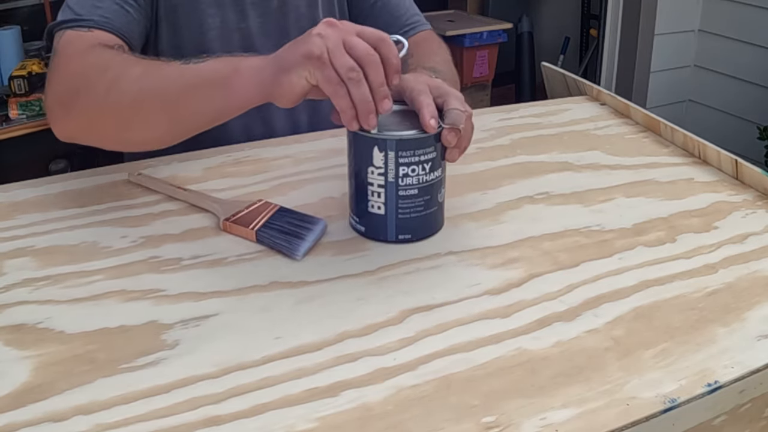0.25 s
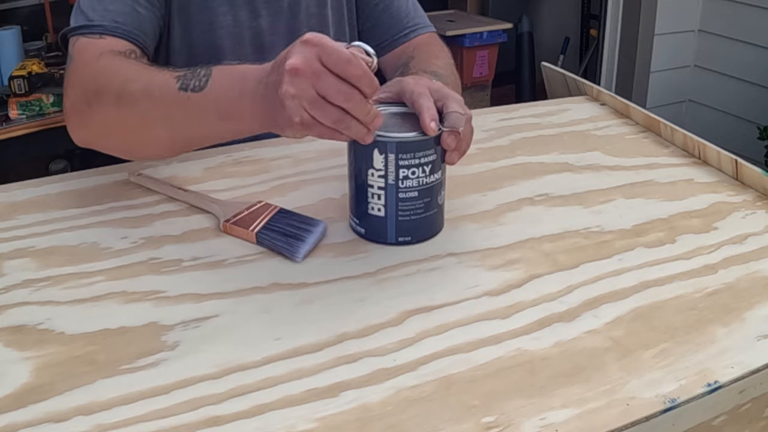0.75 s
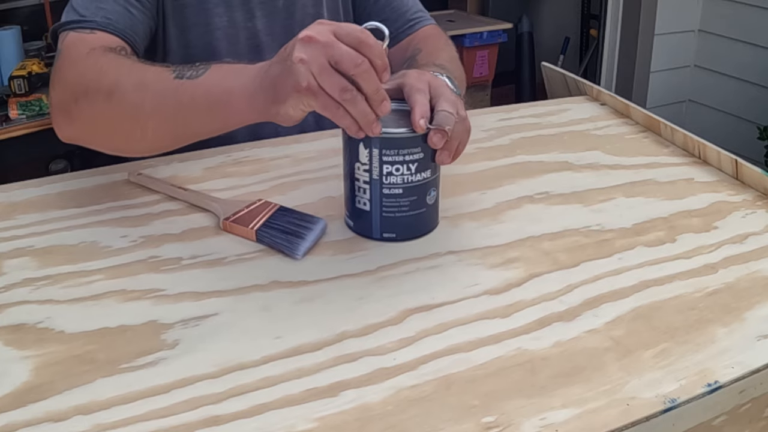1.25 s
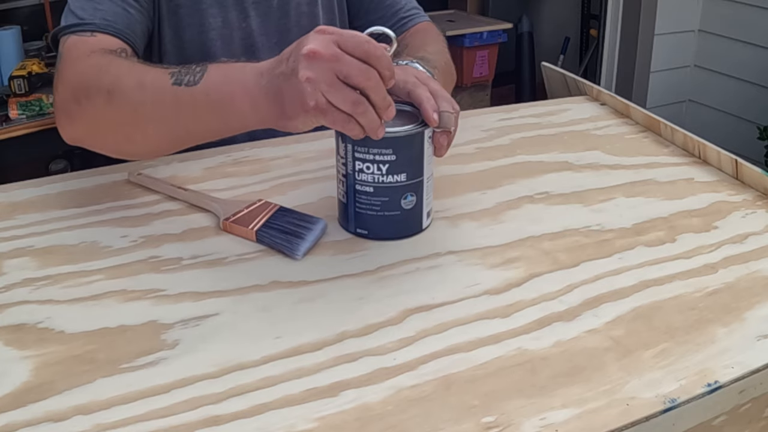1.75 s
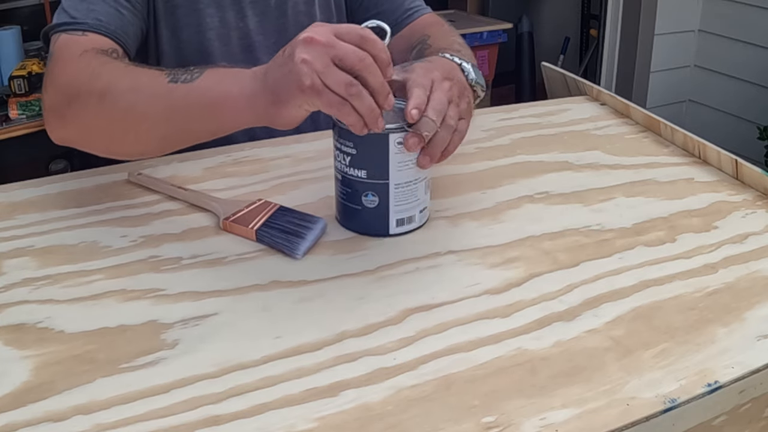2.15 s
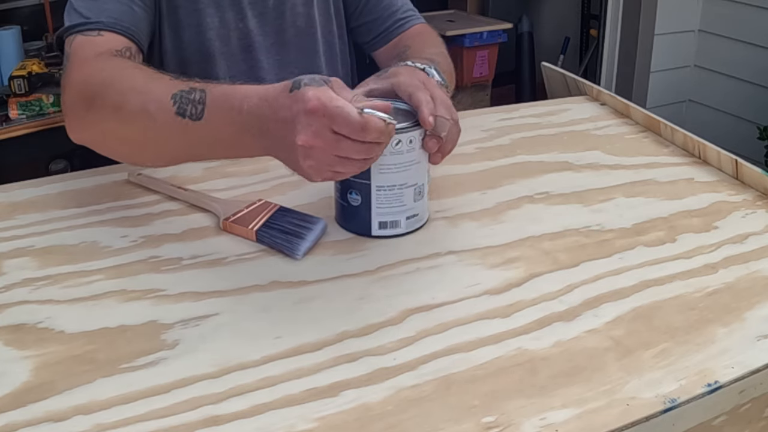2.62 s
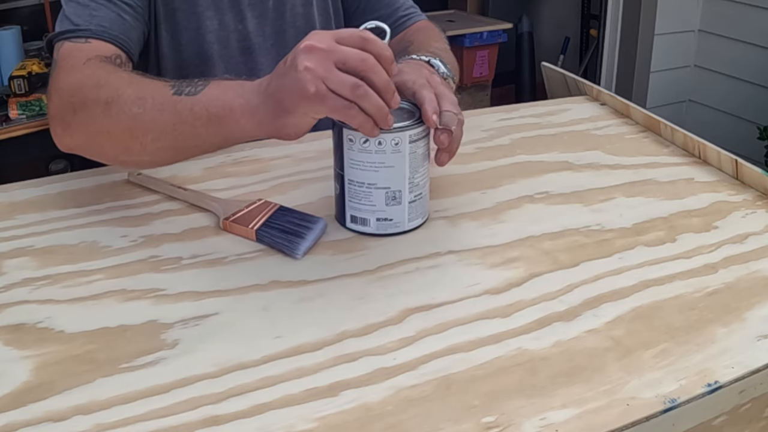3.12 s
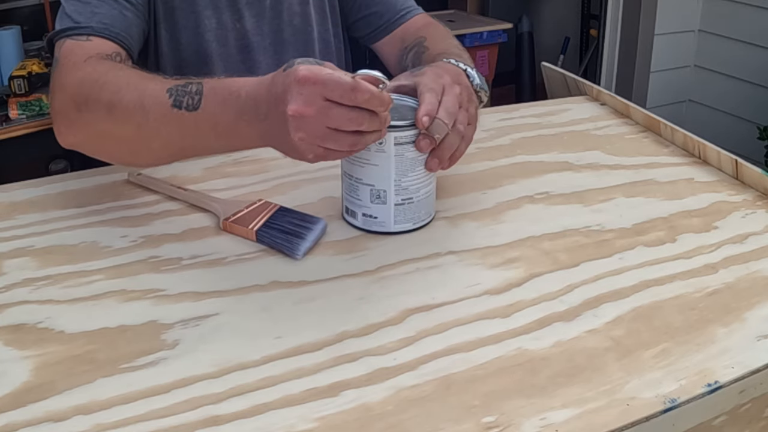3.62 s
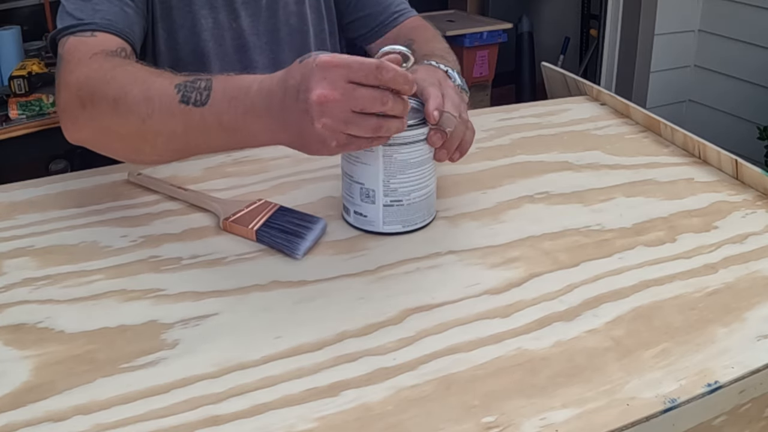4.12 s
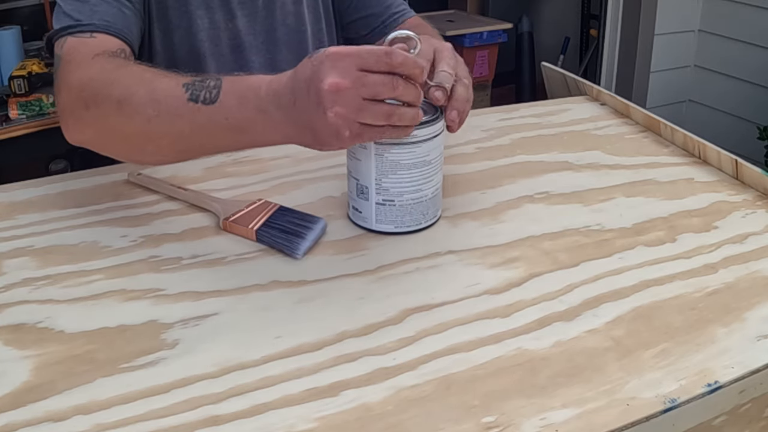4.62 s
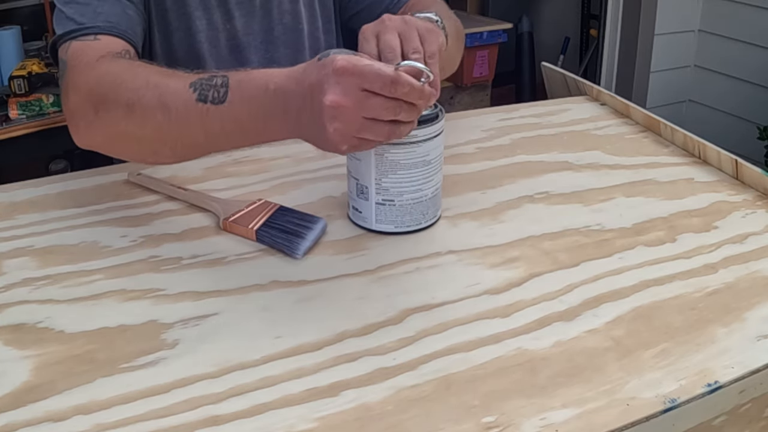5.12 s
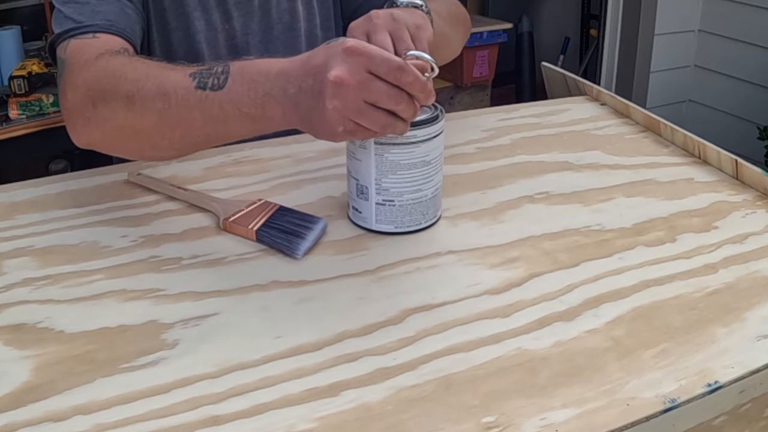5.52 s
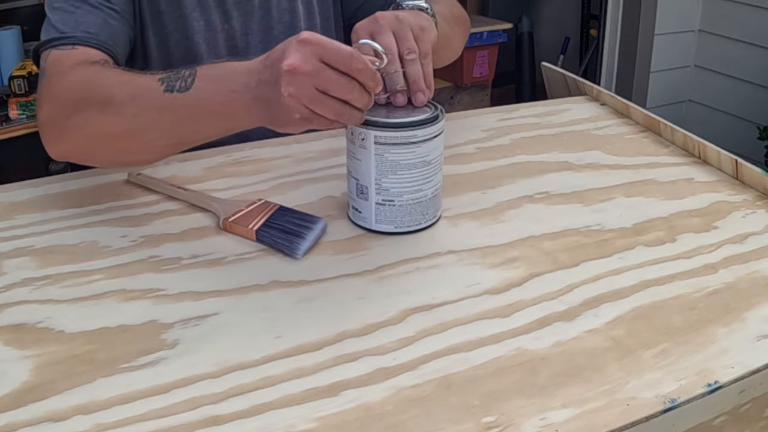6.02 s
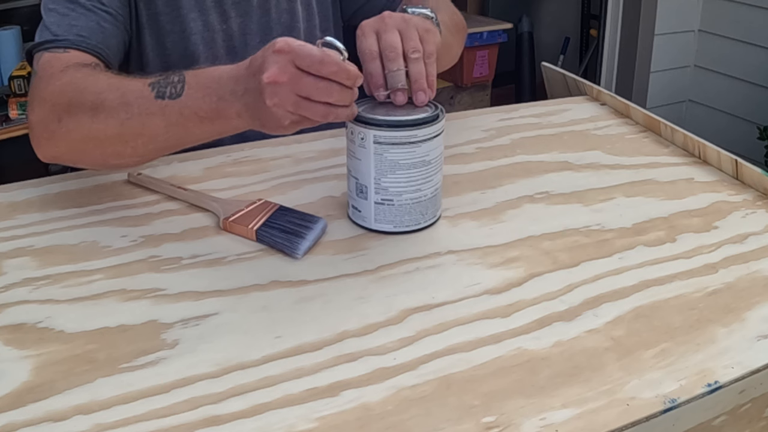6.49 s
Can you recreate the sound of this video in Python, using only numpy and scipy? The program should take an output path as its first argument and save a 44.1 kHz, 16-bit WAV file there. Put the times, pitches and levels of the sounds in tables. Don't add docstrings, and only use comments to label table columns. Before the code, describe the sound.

Over soft distant traffic and leaves, a steel key taps a full can, then snaps loudly against its lid. Buffeting wind puffs, board thumps and dry scraping accompany the can's turning. Short skids and finger rubs continue, a faint insect buzzes, a motor hums low far away, and a last click leads to the lid rubbing loose. Short outdoor-like reflections.

```python
import sys
import numpy as np
from scipy import signal
from scipy.fft import rfft, irfft
from scipy.io import wavfile
from scipy.ndimage import uniform_filter1d

SR = 44100
rng = np.random.default_rng(int(sys.argv[2]) if len(sys.argv) > 2 else 0)


def file_out(sig):
    cols = np.atleast_2d(sig).T
    lim = np.clip(cols, -1, 1)
    pcm = np.round(lim * 32767).astype(np.int16)
    wavfile.write(sys.argv[1], SR, pcm)


def invert_db(x):
    u = np.asarray(x, float) / 20
    return 10 ** u


N = 297675
TIME = np.arange(N) / SR

# tone in Hz, level in dB, time to fall 60 dB in seconds.
LID_MODES = [(1175, 7, 0.008), (1455, -4, 0.065), (1587, -2.5, 0.034), (1970, -8, 0.042)]
KEY_MODES = [(4864, 3, 0.039), (5430, 16, 0.011), (5820, 6.5, 0.021), (6380, 2, 0.029), (7800, -9, 0.007),
             (10150, -34, .02), (11400, -14, 0.0091)]
RIM_MODES = [(2127, -15, 0.066), (2652, -3.5, 0.027), (3400, -35, 0.04), (3666, -14, 0.065)]
# start in seconds, rim level in dB, then key, lid and can body
# in dB relative to the rim.
CLICK_EVENTS = [(0.037, -34.5, -1.5, 10.5, 5.5), (0.0492, -36.5, -6, -6, 11.5), (0.3544, -25.5, 0, 2, -4.5),
                (0.641, -67.5, 12.5, -1, -10), (0.9723, -36.5, -2, -3.5, -6), (2.0926, -49, -4, 3, 6.5),
                (2.3081, -36, -5, -20, -14), (2.7148, -30, -10, -5, 3.5), (2.7305, -37, 6, 11.5, 6.5),
                (2.834, -32.5, -7, -12, -4), (3.0669, -40, -4, 3, 9), (3.1856, -43, -29, -13, 13.5),
                (3.2136, -33, -9.5, 5, 7.5), (3.5078, -50, 0.5, 7, 11), (3.6174, -54.5, 4, 6, -6),
                (3.9807, -48, -5, -12, 8.5), (4.0041, -49, -30, -2, 14.5), (4.4225, -62.5, -22, 1, 24.5),
                (4.721, -66.5, 13, -5, -9), (5.084, -46.5, 2, -2.5, 3), (5.5735, -34.5, -1.5, 1.5, 5),
                (5.8323, -53, -8, 11, 17), (6.6501, -37, -11, -21, 0)]


def evened(x):
    return x / np.sqrt(np.mean(x ** 2) + 1e-20)


def read(points, hz):
    f, value = np.transpose(points)
    return np.interp(np.log(hz + 1), np.log(f + 1), value)


def add(mix, s, sound):
    part = mix[round(s * SR):][:len(sound)]
    part += sound[:len(part)]


def coloured(x, points):
    size = x.shape[-1]
    gain = invert_db(read(points, np.fft.rfftfreq(size, 1 / SR)))
    return evened(irfft(rfft(x) * gain, size))


def ringing(modes, t, extra_db=0):
    hz, db, t60 = np.transpose(modes)[:, :, None]
    fading = invert_db(db + np.reshape(extra_db, (-1, 1)) - 60 * t / t60)
    ring = (fading * np.sin(2 * np.pi * hz * t)).sum(0)
    return ring / abs(ring).max()


def grains(size, spread_db, share):
    big = invert_db(spread_db * np.minimum(rng.exponential(1, size), 4))
    return rng.standard_normal(size) * big * (rng.random(size) < share)


def window(t, start, end, attack_s, release_s):
    return np.clip(np.minimum((t - start) / attack_s, (end - t) / release_s), 0, 1)


def background():
    # tone in Hz, likeness of left and right from 0 to 1.
    likeness = [(60, 0.99), (180, 1), (530, 0.82), (1570, 0.3), (4660, 0.7), (13800, 0.4)]
    # tone in Hz, left minus right in dB.
    balance = [(60, -1), (180, -0.5), (530, 3.5), (1570, 3), (4660, -0.5), (13800, 6)]
    # tone in Hz, level in dB per Hz.
    air_colour = [(12, -24), (22, -22), (45, -4), (70, -2), (130, -5.5), (165, -17), (250, -18.5),
                  (550, -25.5), (1300, -30.5), (2200, -41.5), (4000, -50), (6400, -49.5), (7700, -54.5),
                  (8400, -62.5), (12300, -66), (13500, -85)]
    level_db, patch_db = -41.5, 1.6
    frames, hz = N // 512 + 5, np.fft.rfftfreq(2048, 1 / SR)
    a, b, c, d, patches = rng.standard_normal((frames, 1025, 5)).T
    patches = uniform_filter1d(patches, size=24, axis=0)
    patches = evened(uniform_filter1d(patches, size=8, axis=1))
    same = np.clip(read(likeness, hz), 0, 1)[:, None]
    lean = invert_db(read(balance, hz) / 2)[:, None]
    left = a + 1j * b
    right = same * left + np.sqrt(1 - same ** 2) * (c + 1j * d)
    z = np.array([lean * left, right / lean])
    z *= invert_db(read(air_colour, hz)[:, None] + patch_db * patches)
    return invert_db(level_db) * evened(signal.istft(z, nperseg=2048, noverlap=1536)[1][:, :N])


def wind():
    # middle in seconds, length in seconds, rumble in dB, flutter in dB relative to the rumble,
    # left minus right in dB.
    gusts = [(0.065, 0.075, -35, -4.5, -1), (0.388, 0.058, -46.5, 16.5, -2), (1.015, 0.19, -26.5, -10, 3.5),
             (1.232, 0.18, -26, -13, -5), (1.52, 0.3, -32.5, -14.5, -6), (1.704, 0.11, -26.5, -0.5, -10.5),
             (1.805, 0.12, -23, -11, -7.5), (1.99, 0.12, -32.5, -18.5, -9), (2.265, 0.33, -31.5, -13, -5.5),
             (2.613, 0.3, -29.5, -37, -2), (2.73, 0.28, -28, -3, -6), (2.878, 0.097, -32, -12, -5),
             (3.052, 0.19, -32.5, -9, -1), (3.245, 0.17, -48, -5, -2), (3.54, 0.15, -45, -16, 0),
             (3.652, 0.27, -40.5, -9.5, 0), (3.873, 0.084, -48, -2, 4), (3.989, 0.27, -33, -10.5, -2),
             (4.187, 0.16, -37.5, -32, -5), (4.607, 0.079, -38.5, -5.5, 0)]
    edge_db = -11
    shared, left, right = grains((3, N), 1.2, 260 / SR)
    eddies = 1.14 * shared + 0.5 * np.array([left, right])
    rumble = coloured(eddies, [(8, -38), (22, 8.5), (70, -4.0), (110, -14.0), (200, -54), (400, -140)])
    flutter = coloured(eddies, [(50, -6.5), (100, -7.5), (170, -3.5), (300, -14), (500, -35.5),
                                (900, -52.0), (2000, -140)])
    middle, length, db, flutter_db, pan_db = np.transpose(gusts)[:, :, None]
    coarse = TIME[::64]
    arch_db = db + edge_db * (2 * (coarse - middle) / length) ** 2
    ports_db = np.array([arch_db + pan_db / 2, arch_db - pan_db / 2])
    low = [np.interp(TIME, coarse, gain) for gain in invert_db(ports_db).sum(1)]
    high = [np.interp(TIME, coarse, gain) for gain in invert_db(ports_db + flutter_db).sum(1)]
    return low * rumble + high * flutter


def catch(db, hz, rise_s, haste):
    t = np.arange(0, 8 * rise_s, 1 / SR)
    slip = evened(uniform_filter1d(rng.standard_normal(len(t)), size=round(rise_s * SR / 2)))
    swell = haste * t / rise_s * np.exp(1 - haste * t / rise_s)
    return invert_db(db) * (1 + 0.27 * slip) * swell * np.sin(2 * np.pi * hz * t)


def catches():
    # time in seconds, level in dB, tone in Hz.
    pings = [(0.0354, -56, 11200), (0.0354, -60, 7300), (5.5735, -33, 3270), (0.0484, -54, 9000),
             (0.0484, -41, 4760), (0.0489, -58.1, 10750), (0.9723, -53, 10860), (0.9723, -58, 7800),
             (0.9728, -53, 9100), (0.9733, -57, 9800), (2.1476, -46, 4760), (2.1551, -45.5, 5943),
             (2.1556, -39.5, 1860), (2.1611, -37.5, 3050), (2.1651, -40, 1760), (2.1656, -48.5, 4500),
             (2.178, -43, 1540), (2.1795, -43, 3600), (2.2958, -41, 3430), (2.3078, -55, 5890),
             (2.3078, -39, 3280), (2.7133, -51.7, 10900), (2.7143, -48, 11800), (2.7143, -52, 9700),
             (2.7163, -44, 4530), (2.7298, -52, 12150), (2.7308, -43, 7105), (2.7323, -41, 3600),
             (2.7867, -54, 2380), (2.7956, -44, 2300), (2.8011, -46, 3140), (2.8326, -53, 4280),
             (2.8331, -55, 10292), (3.2127, -31, 3230), (3.9241, -45, 4940), (5.3748, -42.5, 1535),
             (5.5723, -30.5, 1160), (5.5733, -38.5, 5540), (5.5738, -32, 2090), (5.6357, -39, 1510),
             (5.8597, -44.5, 2450), (5.8607, -46, 5230), (5.9315, -46, 1770), (5.9609, -51, 5400)]
    # time in seconds, level in dB, tone in Hz.
    nicks = [(0.9723, -59, 7795), (0.9733, -51, 3930), (0.9775, -41, 1010), (1.2621, -54, 3470),
             (1.2661, -49, 1750), (1.2726, -52.2, 1851), (1.298, -54, 3110), (1.4143, -52, 3570),
             (1.4352, -54, 1894), (1.4477, -50, 2990), (1.453, -42, 1248), (1.4647, -48, 1060),
             (1.4707, -55, 5340), (1.4726, -50, 1500), (1.542, -45.5, 1050), (2.741, -48, 840),
             (2.7804, -47, 1033), (2.7867, -60, 2480), (2.7931, -50, 1076), (2.8101, -55, 3100),
             (2.8328, -38, 1100), (5.5735, -36, 2630), (3.1218, -50, 1840), (3.1837, -45, 3280),
             (3.2148, -39.5, 3680), (3.5055, -54, 1020), (3.5507, -46.5, 1230), (3.5624, -53, 1340),
             (3.8268, -60, 5440), (3.8303, -54, 2560), (3.8308, -50, 1040), (3.8792, -47, 3370),
             (3.9221, -52, 1937), (3.9226, -57, 6640), (3.9889, -48, 1937), (3.9899, -56, 1033),
             (4.4528, -43, 1660), (4.4564, -50, 2700), (4.458, -53, 1033), (4.4653, -50, 3550),
             (4.4733, -58, 1390), (4.5063, -49, 1830), (4.5097, -55, 2700), (4.5382, -45, 1720),
             (5.8312, -48, 2730), (5.8309, -41, 1020), (5.8657, -51, 3660), (5.902, -51, 1500),
             (5.9295, -48, 3400), (5.947, -57, 5230), (5.949, -50, 3402), (5.9759, -42.5, 1679),
             (5.9779, -51, 5900)]
    # time in seconds, level in dB, tone in Hz.
    jolts = [(0.0339, -33, 960), (0.0339, -43, 368), (0.0344, -41, 635), (0.0454, -31.5, 378),
             (0.0459, -41, 947), (0.0479, -29, 682), (1.2721, -35, 586), (1.3399, -41, 574),
             (1.3794, -40, 622), (1.4078, -41.5, 620), (1.518, -43, 565), (1.537, -40, 603),
             (2.1481, -40, 627), (2.1606, -57, 373), (2.1621, -40, 566), (2.201, -44, 643),
             (2.2529, -43, 946), (2.2604, -35, 630), (2.2873, -32, 624), (2.2923, -41.5, 963),
             (2.7178, -26.5, 580), (2.722, -43, 1050), (2.7303, -34, 824), (2.7343, -30.5, 371),
             (2.7482, -41, 1150), (2.8016, -35.5, 350), (2.8316, -39, 550), (2.837, -39, 866),
             (3.0655, -40, 660), (3.1818, -56, 940), (3.1838, -38, 627), (3.2122, -32, 660),
             (3.8956, -52, 626), (3.9221, -51, 575), (3.9789, -37, 332), (3.9879, -41, 607),
             (4.0014, -42.5, 331), (4.0029, -41, 646), (4.4698, -39.5, 634), (4.5052, -41.5, 580),
             (5.5703, -37, 870), (5.5718, -35.5, 536), (5.5743, -44, 324), (5.8337, -33.5, 484),
             (5.8597, -30.5, 383), (5.9669, -42.5, 584), (5.9954, -38.5, 573), (6.0113, -39.5, 570),
             (6.0492, -52, 581), (6.118, -55, 547)]
    ping_rise_s, jolt_rise_s = .0018, .0045
    blow_reach_s, blow_haste = .007, 1.7
    blows = np.append(np.transpose(CLICK_EVENTS)[0], np.inf)
    out = np.zeros(N)
    for rows, rise_s in ((pings, ping_rise_s), (nicks, ping_rise_s), (jolts, jolt_rise_s)):
        for s, db, hz in rows:
            start, haste = s - rise_s / 2, 1
            blow = blows[np.searchsorted(blows, start)]
            if blow - start < blow_reach_s:
                start, haste = blow, blow_haste
            add(out, start, catch(db, hz, rise_s, haste))
    return out


def struck(modes, db):
    t = np.arange(9000) / SR
    return invert_db(db) * ringing(modes, t) * (1 - np.exp(-t / 0.00025))


def thumps():
    # time in seconds, level in dB, board tone in Hz.
    board_knocks = [(0.036, -35, 324), (0.0492, -31.5, 315), (0.3539, -22.5, 307), (0.973, -33.5, 210),
                    (2.716, -18, 197), (2.762, -28.5, 133), (2.778, -19.5, 91), (2.797, -20.5, 111),
                    (3.2135, -36, 282), (4.004, -35, 291), (5.084, -38, 244.5), (5.5763, -27, 230),
                    (5.862, -28, 399), (6.653, -32, 335)]
    out = np.zeros(N)
    for s, db, hz in board_knocks:
        add(out, s, struck([(hz, 0, .06), (1.28 * hz, -6, .04)], db))
    return out


def rattling(ring, depth):
    flutter = evened(uniform_filter1d(rng.standard_normal(len(ring)), size=130))
    return ring * (1 + depth * flutter * np.minimum(np.arange(len(ring)) / 500, 1))


def lid_rings():
    # tone in Hz, level in dB, time to fall 60 dB in seconds.
    knock_modes = [(1460, -11, 0.083), (2270, -7, 0.15), (2630, 5, 0.13), (2930, 1, 0.065), (3400, -22, .1),
                   (3560, -13, 0.037)]
    snap_modes = [(956, 16.5, 0.016), (1545, -11, 0.028), (2186, -2.5, 0.1), (2850, 18.5, 0.015),
                  (2870, -8, 0.039), (3660, 4, 0.02), (5170, -16, 0.024), (6000, 2, 0.022)]
    snap_long_modes = [(1276, -20, .2), (2676, -9, .18), (3345, -15, .22), (945, -8, .24)]
    out = np.zeros(N)
    add(out, 0.036, rattling(struck(knock_modes, -35), .65))
    add(out, .3556, rattling(struck(snap_modes + snap_long_modes, -9), .2))
    return out


def click(db, key_db, lid_db, can_db, rim_hz):
    # tone in Hz, level in dB, time to fall 60 dB in seconds.
    can_modes = [(560, 2, 0.22), (627.5, 9, 0.077), (710, 8, 0.0067), (814, 3.5, 0.026), (885, -15, 0.065),
                 (940, 13, 0.024)]
    # low edge in Hz, high edge in Hz,
    # time for the crack to fall 60 dB in seconds, share of ringing from 0 to 1.
    parts = [(1860, 3440, 0.028, 0.62), (4430, 10100, 0.012, 0.76), (1224, 1660, 0.012, 0.67),
             (398, 940, 0.1, 0.64)]
    tick_db, tick_t60_s = -9, 0.006
    t = np.arange(5000) / SR
    rise = 1 - np.exp(-t / 0.0002)
    contact = uniform_filter1d(rng.standard_normal(len(t)), size=3)
    out = invert_db(db + tick_db - 60 * t / tick_t60_s) * rise * contact
    objects = RIM_MODES + [(rim_hz, 3, .018)], KEY_MODES, LID_MODES, can_modes
    for gain_db, modes, (low, high, t60, share) in zip((0, key_db, lid_db, can_db), objects, parts):
        band = signal.butter(2, [low, high], "bandpass", fs=SR, output="sos")
        crack = signal.sosfilt(band, rng.standard_normal(len(t)) * rise * invert_db(-60 * t / t60))
        ring = ringing(modes, t, 2 * rng.standard_normal(len(modes))) * rise
        part = (1 - share) * crack / abs(crack).max() + share * ring
        out = out + invert_db(db + gain_db) * part / abs(part).max()
    return out


def spot(hz):
    return hz * (1 + 0.095 * rng.standard_normal())


def clicks():
    out = np.zeros(N)
    for s, *blow in CLICK_EVENTS:
        add(out, s, click(*blow, spot(2890)))
    return out


def puffs():
    # middle in seconds, level in dB, left minus right in dB, tone in Hz.
    eddies = [(0.985, -22, -1, 87), (1.004, -19.5, -10, 80.7), (1.214, -21, -4, 78), (1.441, -19.5, 9, 96),
              (1.636, -17, -8.5, 131), (1.656, -15, -7, 81), (1.675, -31, -1, 99.6), (1.72, -13, 5, 79),
              (1.18, -21.5, -5, 80), (1.804, -19.5, -8, 80.7), (1.825, -15.5, -6.5, 86),
              (2.548, -29, -13, 81), (2.644, -14.5, -9, 108.5), (2.674, -17, -9, 116),
              (2.726, -14, -1, 101), (2.739, -13, -2, 116), (2.754, -13, -4, 132), (3.033, -14, -5.5, 95),
              (3.044, -19, -10, 131), (1.74, -22.5, -11, 287), (2.648, -31, -10, 362),
              (2.72, -16.5, -2, 560)]
    out, t = np.zeros((2, N)), np.arange(-900, 900) / SR
    for s, db, pan_db, hz in eddies:
        push = np.cos(2 * np.pi * hz * t + 2 * np.pi * rng.random()) * np.exp(-(t * hz / 0.45) ** 2)
        add(out[0], s + t[0], invert_db(db + pan_db / 2) * push)
        add(out[1], s + t[0], invert_db(db - pan_db / 2) * push)
    return out


def seal():
    # time in seconds, level in dB.
    leak = [
        (1.001, -65.5),
        (1.05, -47),
        (1.064, -50.5),
        (1.08, -68),
        (1.1, -86),
    ]
    # tone in Hz, level in dB per Hz.
    hiss_colour = [(1180, -42), (2000, -7), (2380, -24), (2500, 1), (2670, 0.5), (4330, -9), (6490, -1),
                   (7900, -14.5), (11300, -6.5), (14300, -25)]
    s, db = np.transpose(leak)
    t = np.arange(s[0], s[-1], 1 / SR)
    hiss = coloured(rng.standard_normal(len(t)), hiss_colour)
    return s[0], invert_db(np.interp(t, s, db)) * hiss * signal.windows.tukey(len(t), .2)


def hum():
    # start in seconds, end in seconds, level in dB.
    loose_grips = [(1.234, 1.342, -47.5), (1.316, 1.496, -48.5), (1.502, 1.554, -41), (2.13, 2.2, -52),
                   (2.238, 2.324, -35.5), (3.054, 3.124, -36), (3.88, 3.932, -46), (3.958, 4.043, -41),
                   (4.42, 4.498, -44), (5.925, 6.02, -42), (6.032, 6.211, -41.5)]
    short = np.arange(6000) / SR
    body = invert_db(-60 * short / 0.085) * np.sin(2 * np.pi * 618 * short)
    hollow = evened(signal.oaconvolve(grains(N, 1.8, .15), body)[:N])
    level, fade_s = np.zeros(N), 0.024
    for start, end, db in loose_grips:
        level += invert_db(db - 6.5) * window(TIME, start, end, fade_s, fade_s)
    return hollow * level


def stroke(row, modes, judder_db, ring, attack_s, release_s):
    # tone in Hz, level in dB per Hz.
    rasp_colour = [(250, 3), (450, 4), (800, -0.5), (1400, -1.5), (2200, -5.5), (3500, -10), (4500, -19),
                   (6000, -34), (10000, -89)]
    grit_colour = [(2500, -44), (4000, -11.5), (5500, 2.5), (7500, -4.5), (10000, -8), (12500, -11),
                   (14300, -25)]
    start, end, first_db, last_db, grit_db = row
    t, short = np.arange(18000) / SR, np.arange(3000) / SR
    judder = evened(uniform_filter1d(rng.standard_normal(len(t)), size=250))
    slips = grains(len(t), 1.8, .15) * invert_db(judder_db * judder)
    wall = evened(signal.oaconvolve(slips, ringing(modes, short))[:len(t)])
    steel = evened(signal.oaconvolve(slips, ringing(KEY_MODES, short))[:len(t)])
    rasp = coloured(slips, rasp_colour) + ring * wall
    grit = coloured(slips, grit_colour) + ring * steel
    pressure = invert_db(np.interp(t, [0, end - start], [first_db, last_db]))
    grip = window(t, 0, end - start, attack_s, release_s)
    return grip * pressure * (rasp + invert_db(grit_db) * grip ** 2 * grit)


def strokes(rows, modes, **kind):
    out = np.zeros(N)
    for row in rows:
        add(out, row[0], stroke(row, modes, **kind))
    return out


def turning():
    # start in seconds, end in seconds, pressure at start in dB, pressure at end in dB,
    # grit in dB relative to the rasp.
    turns = [
        (1.24, 1.59, -52.5, -48.5, -17.5),
        (2.125, 2.335, -40, -43, -18),
        (2.72, 2.88, -52.5, -41.5, -17),
    ]
    return strokes(turns, LID_MODES + RIM_MODES, judder_db=1.7, ring=0.12, attack_s=0.016, release_s=0.043)


def skid(*blow):
    length_s = .0022
    t = np.arange(500) / SR
    slips = grains(len(t), 0.41, 0.084) * t / length_s * np.exp(-t / length_s)
    once = click(*blow)
    chatter = signal.oaconvolve(once, slips)
    return chatter * abs(once).max() / abs(chatter).max()


def skids():
    # start in seconds, rim level in dB, then key, lid and can body in dB relative to the rim.
    slips = [(1.262, -46.5, -7, -5, -2), (1.2714, -54, -18, -3, 1), (1.299, -52, -13, -19, -1),
             (1.4476, -46.5, -1.5, -9, 4), (1.4665, -49, 2, -3, 9.5), (2.7871, -46, -22, -9, 7),
             (3.12, -48.5, -31, -2, 4), (3.8259, -43.5, -4, -8, 7.5), (3.8777, -48, -19, -20, 8),
             (3.9205, -46.5, 3, -15, 12.5), (4.451, -42, -12, -14, -3), (4.505, -47.5, -1.5, -11, 6),
             (4.5382, -50.5, 1, -12, 9.5), (4.5855, -55, -12, -11, 15), (5.374, -51, 3, 4, 9),
             (5.6331, -59.5, 7, 9, 22), (5.8215, -58, 8, -5, 14), (5.856, -45, 4, 8, 1),
             (6.0466, -67, 14, 4, 27)]
    out = np.zeros(N)
    for s, *blow in slips:
        add(out, s, skid(*blow, spot(3340)))
    return out


def katydid():
    # start in seconds, end in seconds, level in dB, wing strokes per second.
    songs = [
        (1.334, 1.597, -80, 88),
        (3.235, 3.512, -78.5, 126),
        (5.724, 6.037, -77, 110),
    ]
    buzz = coloured(rng.standard_normal(N), [(6700, -35), (7200, -2), (7450, 9), (7750, -23), (8200, -44.5)])
    out = np.zeros(N)
    for start, end, db, rate in songs:
        wings = np.cos(np.pi * rate * (TIME - start)) ** 4
        out += invert_db(db) * wings * window(TIME, start, end, 0.072, 0.02)
    return 2.9 * out * buzz


def sliding():
    # start in seconds, end in seconds, pressure at start in dB, pressure at end in dB,
    # grit in dB relative to the rasp.
    rubs = [(6.0, 6.23, -61.5, -57.5, -15), (1.85, 2.05, -64, -63, -12.5), (2.05, 2.16, -65, -58, -9),
            (2.62, 2.76, -69, -42.5, -12), (2.83, 3.05, -52.5, -52, -16), (3.34, 3.71, -58.5, -59, -15.5),
            (4.08, 4.39, -55.5, -53, -16.5), (5.6, 5.87, -72, -51.5, -15.5)]
    return strokes(rubs, LID_MODES + RIM_MODES, judder_db=.6, ring=0.32, attack_s=0.033, release_s=0.039)


def dragging():
    # start in seconds, end in seconds, pressure at start in dB,
    # pressure at end in dB, grit in dB relative to the rasp.
    pushes = [
        (2.14, 2.19, -50, -57, -9),
        (2.25, 2.312, -58, -43, -10),
        (2.78, 2.83, -52, -47, -20),
    ]
    drags = [
        (3.825, 3.97, -49.5, -52.5, -17.5),
        (4.43, 4.5, -51, -46, -16.5),
        (4.5, 4.61, -49.5, -53.5, -15.5),
    ]
    return strokes(pushes + drags, LID_MODES + RIM_MODES,
                   judder_db=2.1, ring=0.18, attack_s=0.0056, release_s=0.013)


def motor():
    # time in seconds, pitch in Hz, level in dB.
    course = [(3.4, 133.8, -42.5), (4.5, 133.8, -51.5), (4.8, 132.8, -44.5), (5.3, 131.5, -43.5),
              (5.7, 131.2, -55.5), (5.999, 130.8, -45.5), (6.75, 129.3, -47.5)]
    s, hz, db = np.transpose(course)
    waver = evened(uniform_filter1d(rng.standard_normal(N), size=6000))
    tone = np.sin(2 * np.pi * np.cumsum(np.interp(TIME, s, hz) + 1.33 * waver) / SR)
    fade_in = np.clip((TIME - s[0]) / 0.48, 0, 1)
    return np.sqrt(2) * tone * invert_db(np.interp(TIME, s, db)) * fade_in


def lifting():
    # start in seconds, end in seconds, pressure at start in dB, pressure at end in dB,
    # grit in dB relative to the rasp.
    lifts = [
        (5.87, 6.025, -50, -50, -8.5),
    ]
    # tone in Hz, level in dB, time to fall 60 dB in seconds.
    groove_modes = [(1575, 6, 0.052), (1830, 7, 0.021), (3480, 2, 0.034), (4740, -26, .05)]
    return strokes(lifts, groove_modes, judder_db=0.6, ring=0.48, attack_s=0.03, release_s=0.025)


def porch(x):
    # tone in Hz, time to fall 60 dB in seconds.
    decay = [(200, 0.066), (1000, 0.31), (3000, 0.25), (10000, .1)]
    taps = np.zeros((2, SR // 2))
    starts = np.arange(200, SR // 2 - 20, 20)
    at = starts + rng.integers(0, 20, (2, len(starts)))
    np.put_along_axis(taps, at, rng.choice([-1., 1.], at.shape), 1)
    hz, t, z = signal.stft(taps, SR, nperseg=256)
    tail = signal.istft(z * invert_db(-60 * t / read(decay, hz)[:, None]), SR, nperseg=256)[1]
    return signal.fftconvolve(x[None], tail / np.linalg.norm(tail[0]), axes=1)[:, :N]


def ports(x):
    # tone in Hz, left minus right in dB.
    can_balance = [(60, 0), (230, -0.5), (910, -1), (3550, -2), (13800, 2)]
    # tone in Hz, lag of the left port in radians.
    can_lag = [(500, .06), (3000, 0.54), (10500, 0.51), (13000, 1.5)]
    hz = np.fft.rfftfreq(N, 1 / SR)
    lean = invert_db(read(can_balance, hz) / 2) * np.exp(-.5j * read(can_lag, hz))
    return irfft(rfft(x) * np.array([lean, 1 / lean]), N)


def scene():
    far = background() + motor() + katydid() * invert_db([[1.5], [-1.5]])
    air = wind() + puffs()
    can = catches() + thumps() + lid_rings() + clicks() + skids() + hum()
    can += turning() + sliding() + dragging() + lifting()
    add(can, .0192, invert_db(-21) * can)
    room = porch(can)
    add(can, *seal())
    return ports(can) + invert_db(-16) * room + far + .32 * np.tanh(air / .32)


def roll_off(x):
    return signal.sosfilt(signal.butter(12, 14440, fs=SR, output="sos"), x)


def record(dry):
    edge = signal.firwin(255, 14300, window=("kaiser", 8), fs=SR)
    mix = signal.oaconvolve(dry, edge[None], "same")
    return roll_off(mix)


dry = scene()
out = record(dry)
file_out(out)
```